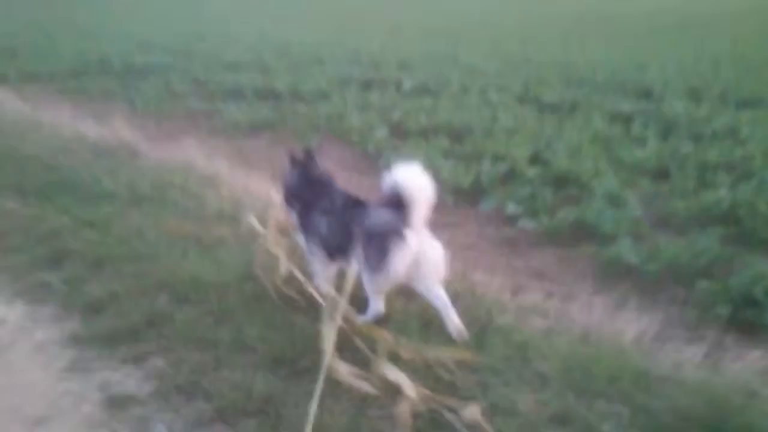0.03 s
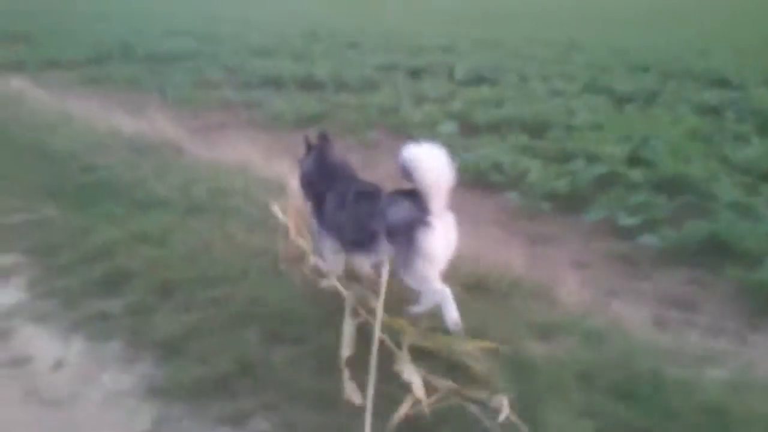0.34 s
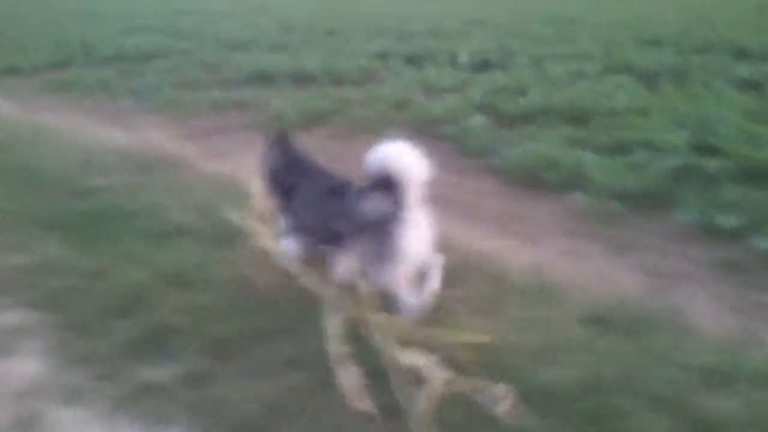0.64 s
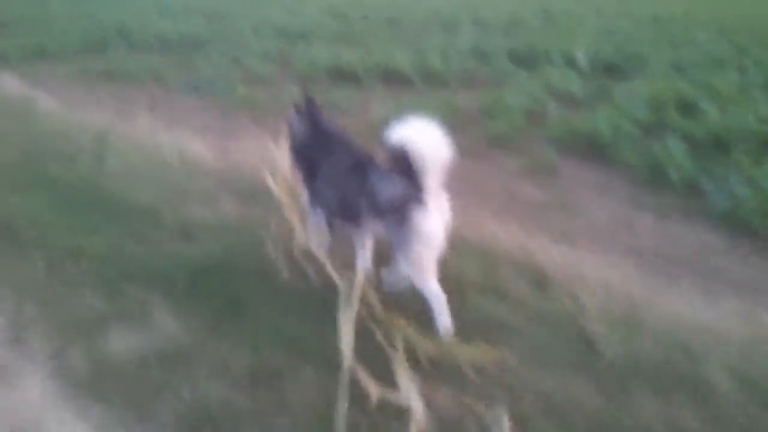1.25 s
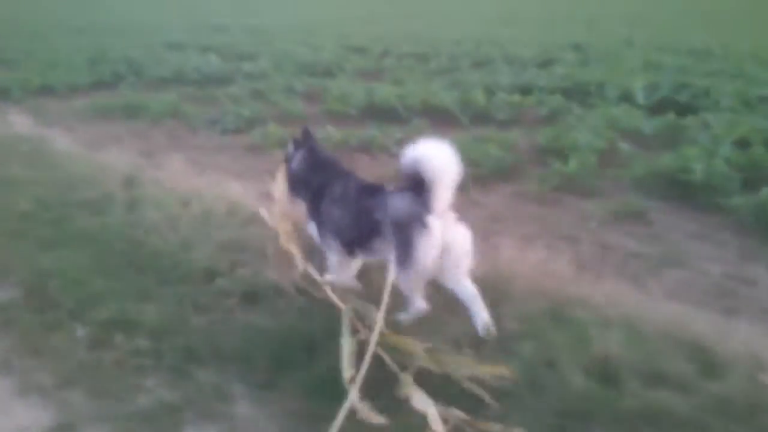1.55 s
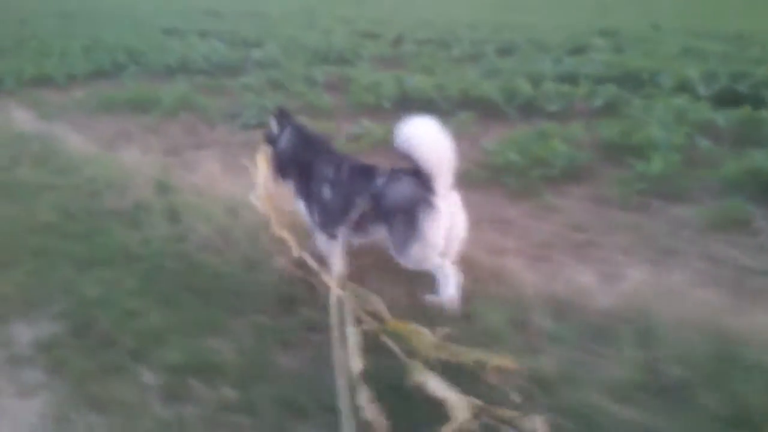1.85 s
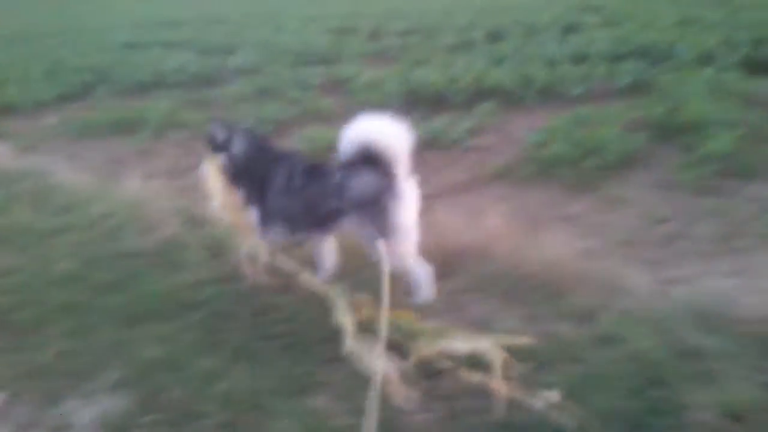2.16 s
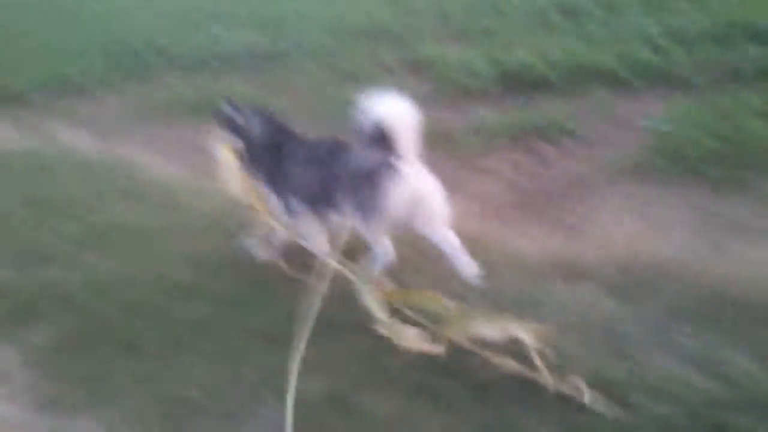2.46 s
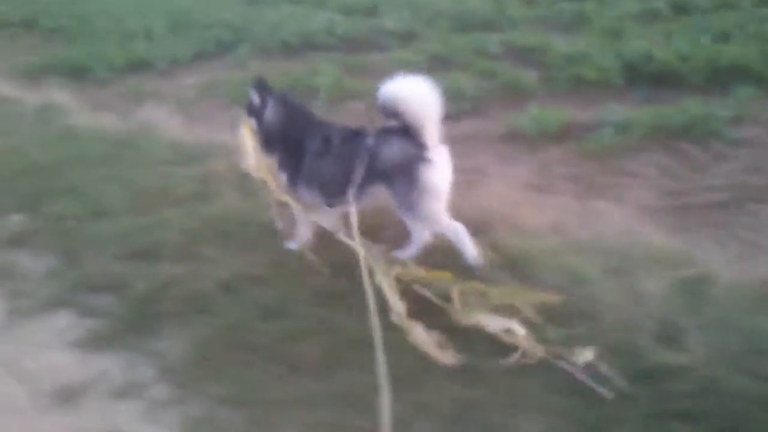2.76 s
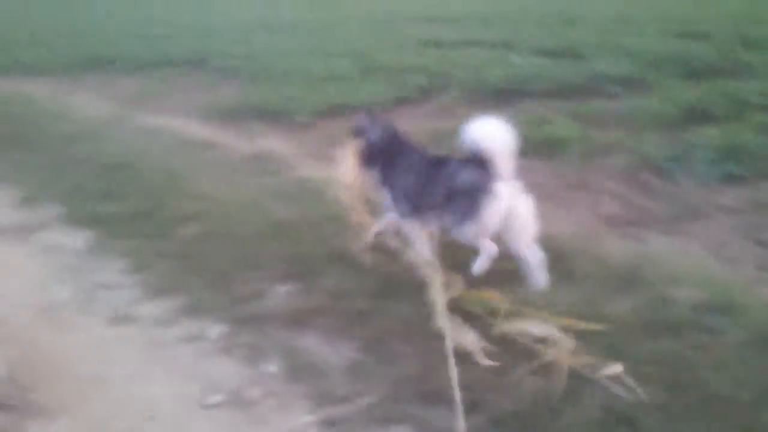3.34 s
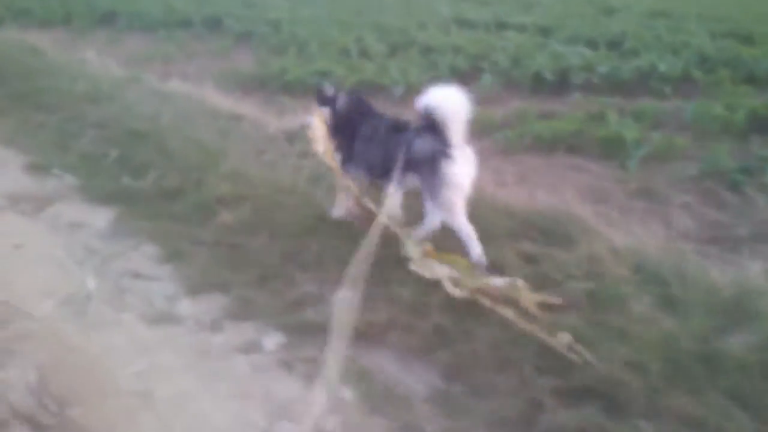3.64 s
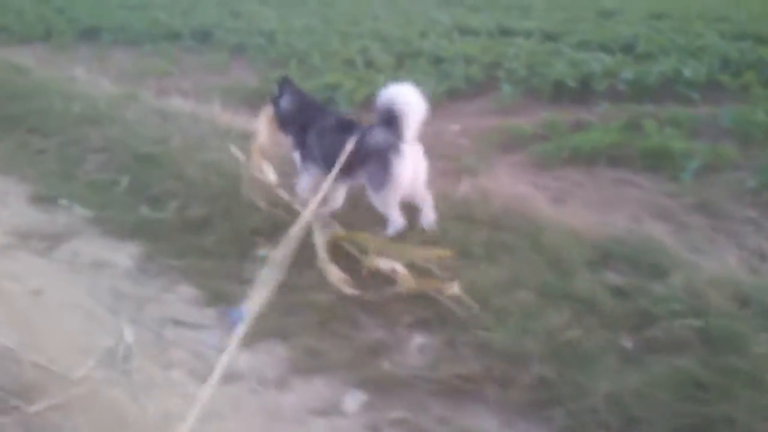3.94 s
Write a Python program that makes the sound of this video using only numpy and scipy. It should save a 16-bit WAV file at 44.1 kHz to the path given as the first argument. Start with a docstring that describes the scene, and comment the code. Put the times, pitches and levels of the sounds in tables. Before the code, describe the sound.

Low wind buffets the microphone in uneven puffs at a field edge. A sharp click opens it, and one hard clack sounds close by midway. Underneath, a dry stalk drags faintly through grass and feet scuff the dirt.

```python
"""A field edge, on a walk behind a dog that drags a dry stalk through the grass.
The stalk swishes, crackles in tiny fibre clicks and cracks once, ringing its woody modes.
Feet scuff the dirt; sharp ticks and one hard clack sound close by. Wind eddies buffet the microphone.
The recorder starts with a click and adds a soft hiss."""
import sys
import numpy as np
from scipy import signal
from scipy.fft import rfft, irfft
from scipy.io import wavfile
from scipy.ndimage import uniform_filter1d

SR = 44100
rng = np.random.default_rng(int(sys.argv[2]) if len(sys.argv) > 2 else 0)


def transcribe(signal):
    """Save signal, clipped to [-1, 1], as a 16-bit WAV file at the path in sys.argv[1]."""
    frames = np.atleast_2d(signal).T
    limited = np.clip(frames, -1, 1)
    pcm = np.round(limited * 32767).astype(np.int16)
    wavfile.write(sys.argv[1], SR, pcm)


N = 176400

# Spectra. Each row: frequency in Hz, relative density in dB.
HISS_SPECTRUM = [(290, -22), (500, -8), (621, -10), (678, -11), (906, -13), (1020, -11), (1360, -10.5),
                 (1980, -8), (2540, -7.5), (3700, -13.5), (4210, -14), (4470, -10.5), (5390, -6.5),
                 (7530, -11.5), (9490, -3.5), (10500, -10), (11300, -6.5), (12500, -18), (14000, -10.5),
                 (15300, -20), (16000, -17.5)]
RUMBLE_SPECTRUM = [(10, -10.5), (19, -1), (38, 1), (62, -2), (105, -9), (160, -19), (240, -31),
                   (500, -71.5)]  # large eddies
FLUTTER_SPECTRUM = [(60, -12.5), (130, 0), (180, 1.5), (290, -9.5), (420, -20), (600, -25.5), (1000, -46.5),
                    (2000, -74)]  # small eddies
BREEZE_SPECTRUM = [(20, 3.5), (40, -2), (60, -7), (100, -14.5), (200, -25.5), (400, -33.5), (800, -49.5),
                   (2000, -56)]  # light air between buffets
CLACK_SPECTRUM = [(200, -18.5), (900, -8), (2000, -2.5), (3800, -9.5), (4700, -5.5), (5700, 5),
                  (7200, -0.5), (8800, -6.5), (10000, -27), (16000, -41)]
SWISH_SPECTRUM = [(3500, -5), (5500, -5), (7300, -6), (9300, 2), (11000, -3.5), (12800, -5), (14200, -5),
                  (16000, -23)]
LEAF_SPECTRUM = [(400, -3), (900, -4), (1400, -7), (2000, -2), (2900, -3), (4000, -12.5), (5500, -2),
                 (8000, -21.5)]
SWITCH_SPECTRUM = [(60, 5.5), (700, 0.5), (1400, -10.5), (2600, 1), (3500, -4), (4800, -20.5), (6600, 0),
                   (7900, -13.5), (9300, 2.5), (11800, -23), (13800, -3), (16000, -14.5)]

# Hiss envelope. Each row: time in seconds, level in dB.
HISS_ENVELOPE = [(0, -55.5), (3.33, -55.5), (3.57, -57.5), (3.72, -57), (4, -55.5)]
# Wind buffets. Each row: centre and length in seconds, rumble and flutter in relative dB.
WIND_BUFFETS = [(0.165, 0.053, -27.5, -47.5), (0.226, 0.01, -20, -47), (0.269, 0.031, -28.5, -41.5),
                (0.308, 0.02, -23, -36), (0.33, 0.029, -28.5, -46), (0.439, 0.05, -25.5, -40.5),
                (0.477, 0.024, -31.5, -46), (0.521, 0.036, -33, -45), (0.575, 0.042, -36.5, -47.5),
                (0.722, 0.065, -32, -43), (0.863, 0.074, -29, -44), (0.93, 0.047, -32, -51),
                (1, 0.015, -31.5, -66), (1.042, 0.032, -26.5, -39), (1.09, 0.04, -28.5, -43.5),
                (1.148, 0.023, -32, -46), (1.201, 0.027, -29, -54), (1.248, 0.06, -31.5, -43),
                (1.424, 0.064, -28, -46.5), (1.574, 0.081, -30, -48), (1.656, 0.035, -29, -45),
                (1.742, 0.054, -38, -72), (1.858, 0.045, -29.5, -46.5), (1.914, 0.03, -31.5, -77),
                (2.103, 0.048, -40.5, -53.5), (2.179, 0.036, -31.5, -56), (2.286, 0.035, -24.5, -57),
                (2.399, 0.043, -32.5, -49.5), (2.447, 0.027, -37, -48), (2.518, 0.06, -27, -43),
                (2.639, 0.047, -37, -58.5), (2.735, 0.04, -32.5, -50), (2.806, 0.024, -35.5, -45),
                (2.909, 0.06, -31.5, -49), (3.034, 0.066, -30.5, -47), (3.112, 0.04, -34, -45),
                (3.186, 0.059, -30.5, -43.5), (3.248, 0.051, -27.5, -45), (3.314, 0.019, -26.5, -48),
                (3.353, 0.023, -28.5, -50), (3.396, 0.022, -33, -48), (3.472, 0.053, -31, -55),
                (3.561, 0.067, -39, -72), (3.709, 0.027, -39, -67), (3.85, 0.026, -34, -60)]
# Single eddies at the microphone port. Each row: centre and half width in seconds, level in relative dB.
PORT_THUMPS = [(0.157, .0025, -31), (0.18, 0.002, -25.5), (.284, .0014, -33), (.2972, .001, -31),
               (.300, 0.0012, -23), (.427, 0.0015, -26), (.442, 0.0012, -29), (.743, 0.0024, -23.5),
               (.808, 0.0014, -30), (1.042, 0.0043, -23), (1.147, 0.0027, -24.5), (1.239, 0.0019, -23.5),
               (1.267, .0014, -18), (1.404, 0.0016, -31.5), (1.422, 0.0012, -29.5), (1.574, .0017, -26),
               (1.581, .0017, -27), (1.643, 0.0013, -34), (2.033, .0017, -35), (2.444, 0.0021, -31),
               (2.496, 0.0025, -29), (2.518, 0.0012, -34.5), (2.716, 0.0015, -31.5), (2.795, .0019, -29.5),
               (2.936, 0.0027, -29.5), (3.102, 0.0017, -29.5), (3.129, .0022, -28.5),
               (3.232, 0.0014, -28.5), (3.315, 0.0023, -27), (3.391, .0023, -32.5)]
# Feet and dry leaves. Each row: centre and length in seconds, level in dB, band centre and width in Hz.
FOOT_SCUFFS = [(0.184, 0.054, -60, 1120, 1100), (0.336, 0.021, -56.5, 1910, 990),
               (0.663, 0.02, -57, 2360, 2500), (.807, .008, -48, 7000, 6000),
               (0.829, 0.017, -53, 1590, 1780), (0.866, 0.012, -58, 1160, 600),
               (1.035, 0.024, -53.5, 1900, 600), (1.264, 0.025, -53.5, 1810, 1990),
               (1.398, 0.062, -60, 1760, 700), (1.792, 0.024, -53, 1710, 650),
               (2.04, 0.042, -58, 1800, 1410), (2.13, 0.043, -56.5, 1370, 1000),
               (2.223, 0.014, -56, 2900, 1200), (2.45, .035, -61, 1400, 1400),
               (2.504, 0.03, -57.5, 1800, 1500), (2.603, 0.028, -57, 1860, 1100),
               (2.809, 0.017, -52.5, 5900, 2600), (2.867, 0.05, -54.5, 1900, 2000),
               (2.928, .025, -58, 5400, 2400), (2.944, 0.025, -58, 910, 800), (3.049, 0.015, -60, 750, 600),
               (3.06, .1, -55, 9400, 2600), (3.253, 0.046, -54, 1200, 2020), (3.264, .014, -56, 6740, 3500),
               (3.319, 0.045, -59, 970, 1010), (3.78, 0.054, -63, 1290, 1300),
               (3.98, 0.13, -60, 5170, 1800)]
# Dry snaps. Each row: start in seconds, peak in dB, band centre and width in Hz.
DRY_TICKS = [(0.5796, -27.5, 2400, 1600), (.8075, -39, 1900, 1980), (0.81, -33.5, 1030, 596),
             (1.196, -42.5, 1310, 1300), (2.057, -40, 1540, 2000), (2.1057, -38, 1300, 1710),
             (2.158, -43.5, 850, 810), (2.439, -40, 1290, 1000), (2.458, -42, 1200, 1300),
             (2.6848, -33, 2200, 1900), (2.752, -34, 9900, 4000), (2.995, -47.5, 1300, 1810),
             (3.228, -47, 1180, 1400), (3.243, -35.5, 1200, 1700), (3.260, -38, 1400, 2230),
             (3.3215, -44, 905, 910), (3.3425, -31, 5560, 4230)]
# Stalk resonances. Each row: frequency in Hz, T60 in seconds, relative gain in dB.
WOODY_MODES = [(940, 0.038, -1), (1200, 0.014, 3), (1800, .024, 0), (2120, .014, -5), (2900, .016, -9)]
# Stalk sliding over grass. Each row: time in seconds, swish level in dB, leaf level in dB.
DRAG_ENVELOPE = [(0, -70, -66), (.7, -59.5, -60), (.92, -64, -63.5), (1.35, -63, -60.5), (1.6, -62.5, -63),
                 (2.1, -65.5, -63), (2.35, -57, -59), (2.62, -60.5, -61), (2.85, -56, -56.5),
                 (3.08, -55, -68), (3.3, -56, -61), (3.55, -63, -67), (3.77, -58, -62.5), (4, -66.5, -77)]


def undb(db):
    """Decibels to gain."""
    return 10 ** (np.asarray(db) / 20)


def unit(x):
    """Scale to rms 1."""
    return x / np.sqrt(np.mean(x ** 2))


def peak(x, db):
    """Scale to a peak level."""
    return x * undb(db) / np.abs(x).max()


def time_s():
    """Time of every sample."""
    return np.arange(N) / SR


def curve(table, column=1):
    """One table column, linearly interpolated in time."""
    rows = np.array(table)
    return np.interp(time_s(), rows[:, 0], rows[:, column])


def wander(rate_hz):
    """Smooth random drift, rms 1."""
    hold = max(int(SR / rate_hz), 2)
    steps = np.repeat(rng.standard_normal(N // hold + 1), hold)
    return unit(uniform_filter1d(uniform_filter1d(steps, hold), hold)[:N])


def colour(x, spectrum):
    """Minimum-phase filter through a spectrum, falling 10 dB per octave beyond its ends."""
    hz, db = np.array(spectrum).T
    octave = np.log2(np.maximum(np.fft.rfftfreq(N, 1 / SR), 1))
    beyond = np.abs(octave - np.clip(octave, np.log2(hz[0]), np.log2(hz[-1])))
    gain = undb(np.interp(octave, np.log2(hz), db) - 10 * beyond)
    cepstrum = irfft(np.log(gain), N)
    cepstrum[1:N // 2] *= 2
    cepstrum[N // 2 + 1:] = 0
    return irfft(rfft(x) * np.exp(rfft(cepstrum)), N)


def ring(x, hz, width_hz):
    """One broad resonance with steep skirts."""
    low_hz = np.hypot(hz, width_hz / 2) - width_hz / 2
    edges_hz = [low_hz, min(low_hz + width_hz, SR / 2 - 1000)]
    return signal.sosfilt(signal.butter(2, edges_hz, "bandpass", fs=SR, output="sos"), x + 1e-18)


def impulse(at_s):
    """A single sharp push."""
    return 1. * (np.arange(N) == int(at_s * SR))


def rattle(at_s, decay_s):
    """Noise decaying after a push."""
    age_s = time_s() - at_s
    return rng.standard_normal(N) * (age_s > 0) * np.exp(-np.minimum(np.abs(age_s) / decay_s, 40))


def hiss():
    """Soft recorder hiss, dipping near the end."""
    noise = unit(colour(rng.standard_normal(N), HISS_SPECTRUM))
    return noise * undb(curve(HISS_ENVELOPE) + 0.66 * wander(5.5))


def eddies(spectrum, window_s, per_s):
    """Random pressure kicks, coloured and held at even strength."""
    kicks = (rng.random(N) < per_s / SR) * rng.standard_normal(N) + 0.0036 * rng.standard_normal(N)
    pressure = colour(kicks, spectrum)
    power = uniform_filter1d(np.abs(signal.hilbert(pressure)) ** 2 / 2, int(window_s * SR))
    return pressure / np.sqrt(power)


def wind(rumble_trim_db=-3.5, flutter_trim_db=-2, breeze_db=-49.5):
    """Buffets swell and die over a light breeze: large eddies rumble, small ones flutter."""
    rumble_power, flutter_power, t = 0, 0, time_s()
    for at_s, length_s, rumble_db, flutter_db in WIND_BUFFETS:
        swell = np.exp(-np.minimum((2 * (t - at_s) / length_s) ** 2, 40))
        rumble_power += swell * undb(rumble_db) ** 2
        flutter_power += swell * undb(flutter_db) ** 2
    rumble = eddies(RUMBLE_SPECTRUM, window_s=0.044, per_s=800) * np.sqrt(rumble_power)
    flutter = eddies(FLUTTER_SPECTRUM, window_s=0.03, per_s=170) * np.sqrt(flutter_power)
    breeze = eddies(BREEZE_SPECTRUM, window_s=0.051, per_s=2200) * undb(breeze_db + 2 * wander(20))
    return rumble * undb(rumble_trim_db) + flutter * undb(flutter_trim_db) + breeze


def thumps(swell_ratio=3.0, leak_hz=55):
    """Each eddy sucks briefly at the port inside a slower swell; the deepest part leaks away."""
    pressure = np.zeros(N)
    for at_s, half_width_s, db in PORT_THUMPS:
        offset = (time_s() - at_s) / half_width_s
        suction = 1 / (1 + offset ** 2) ** 2
        swell = 1 / (1 + (offset / swell_ratio) ** 2) ** 2 / swell_ratio
        pressure += 1.54 * undb(db) * (swell - suction)
    return signal.sosfilt(signal.butter(2, leak_hz, "highpass", fs=SR, output="sos"), pressure)


def grains(per_s=1500, spread_db=3.5):
    """Dense tiny clicks of dry fibres, a few much stronger than the rest."""
    size = undb(spread_db * np.minimum(rng.exponential(size=N), 5))
    return (rng.random(N) < per_s / SR) * size * rng.choice([-1, 1], N)


def scuffs():
    """Feet on dirt and dry leaves: short swells of gritty friction."""
    out = np.zeros(N)
    for at_s, length_s, db, hz, width_hz in FOOT_SCUFFS:
        grit = unit(ring(grains() + 0.29 * rng.standard_normal(N), hz, width_hz))
        out += grit * undb(db) * np.exp(-2 * ((time_s() - at_s) / length_s) ** 2)
    return out


def ticks():
    """Dry snaps with a splintering tail."""
    out = np.zeros(N)
    for at_s, peak_db, hz, width_hz in DRY_TICKS:
        snap = impulse(at_s) + 0.088 * rattle(at_s, decay_s=0.0029)
        out += peak(ring(snap, hz, width_hz), peak_db)
    return out


def clack(at_s=1.7504, peak_db=-12, bounce_s=0.00183, bounce_db=-14):
    """One hard blow near the hand, bouncing once."""
    bounce = undb(bounce_db) * impulse(at_s + bounce_s)
    blow = impulse(at_s) + bounce + 0.025 * rattle(at_s, decay_s=0.0034)
    return peak(colour(blow, CLACK_SPECTRUM), peak_db)


def stalk_crack(at_s=0.802, length_s=0.003, peak_db=-30):
    """A short run of breaking fibres rings the hollow stalk."""
    t = time_s()
    fibres = impulse(at_s) + 0.15 * rng.standard_normal(N) * (t > at_s) * (t < at_s + length_s)
    age_s = t[:SR // 10]
    body = sum(undb(db - 60 * age_s / t60_s) * np.sin(2 * np.pi * hz * age_s)
               for hz, t60_s, db in WOODY_MODES)
    return peak(signal.fftconvolve(fibres, body)[:N], peak_db)


def shimmer(x, bands=32, sway_db=4.5, rate_hz=27.92):
    """Different leaves sound in turn: each narrow band swells and fades on its own."""
    log_hz = np.log(np.fft.rfftfreq(N, 1 / SR) + 1)
    position = np.interp(log_hz, np.log([600, 16000]), [0, bands - 1])
    spectrum = rfft(x)
    out = np.zeros(N)
    for k in range(bands):
        band = irfft(spectrum * np.maximum(1 - np.abs(position - k), 0), N)
        out += band * undb(sway_db * wander(rate_hz))
    return unit(out)


def stalk_drag():
    """The sliding stalk: a fine swish of grass and a coarser crackle of leaves."""
    friction = grains() + 0.5 * rng.standard_normal(N)
    swish = shimmer(colour(friction, SWISH_SPECTRUM))
    swish *= undb(curve(DRAG_ENVELOPE, column=1) + 1.8 * wander(35))
    leaves = shimmer(colour(grains(), LEAF_SPECTRUM))
    leaves *= undb(curve(DRAG_ENVELOPE, column=2) + 1.5 * wander(24.85))
    return swish + leaves


def scene():
    """All sources, mono."""
    return (wind() + thumps() + stalk_drag() + scuffs() + ticks() + clack() + stalk_crack() + hiss())[None]


def record(dry, click_s=0.0595, open_s=0.088, fade_s=0.018, top_hz=15900):
    """The recorder clicks on, opens its input a moment later and cuts the top."""
    click = peak(colour(impulse(click_s), SWITCH_SPECTRUM), db=-1.8)
    tail = undb(-27) * colour(rattle(click_s, decay_s=0.0074), SWITCH_SPECTRUM)
    fade_in = np.clip((time_s() - open_s) / fade_s, 0, 1)
    lowpass = signal.ellip(10, 0.2, 80, top_hz, fs=SR, output="sos")
    return signal.sosfilt(lowpass, dry * fade_in + click + tail)


dry = scene()
out = record(dry)
transcribe(out)
```